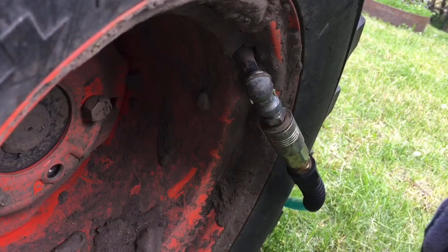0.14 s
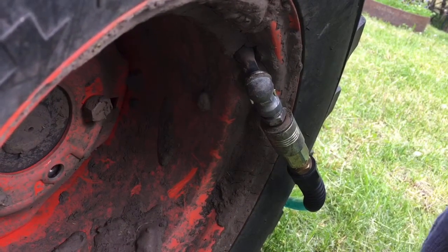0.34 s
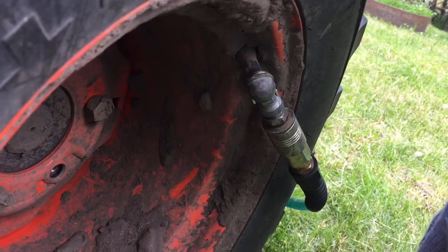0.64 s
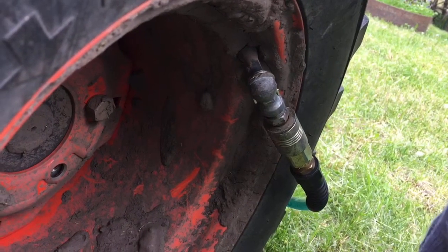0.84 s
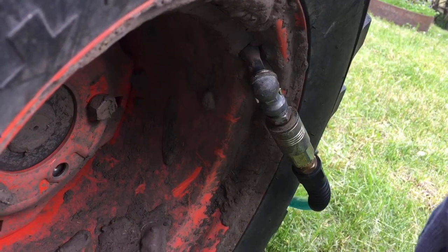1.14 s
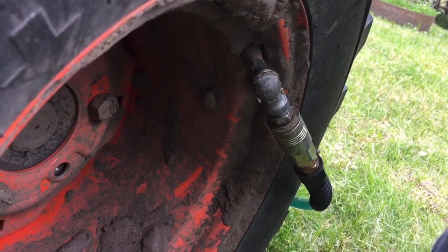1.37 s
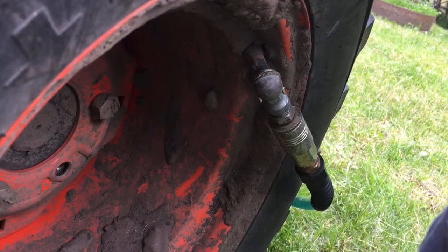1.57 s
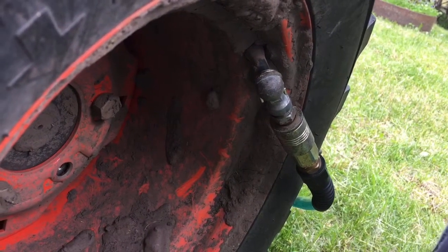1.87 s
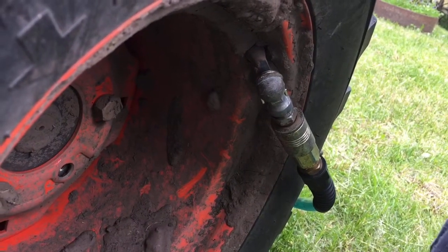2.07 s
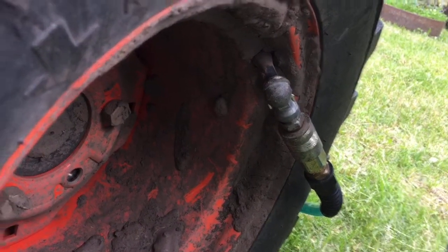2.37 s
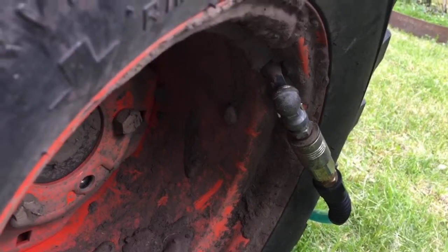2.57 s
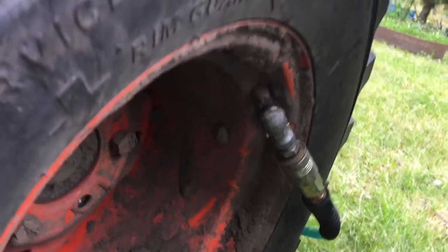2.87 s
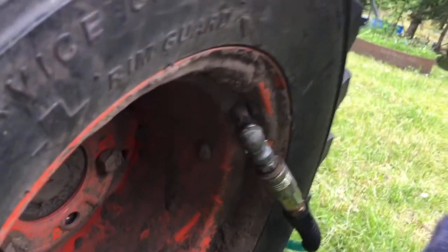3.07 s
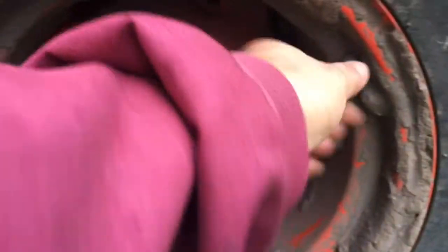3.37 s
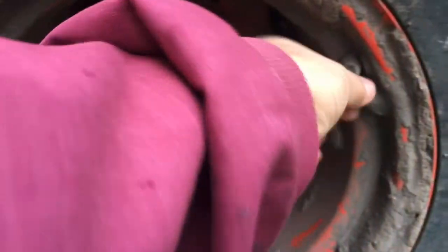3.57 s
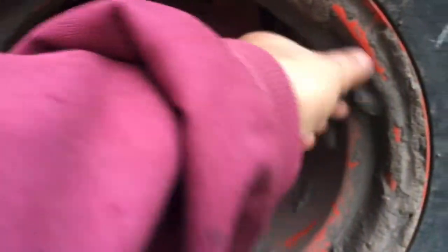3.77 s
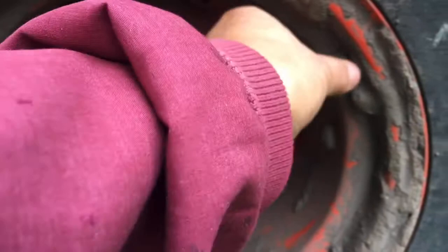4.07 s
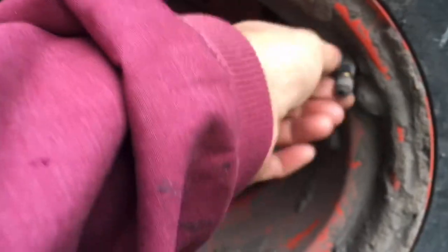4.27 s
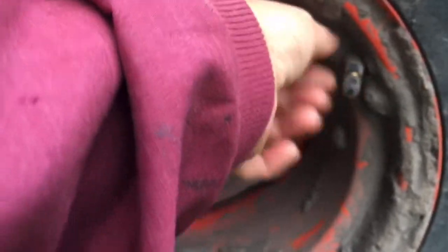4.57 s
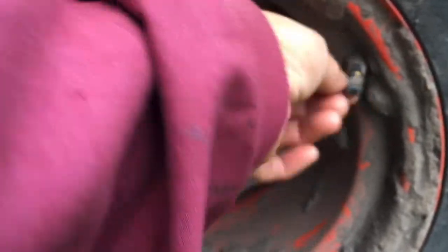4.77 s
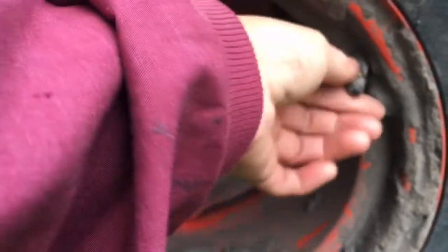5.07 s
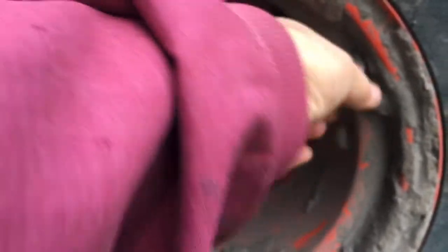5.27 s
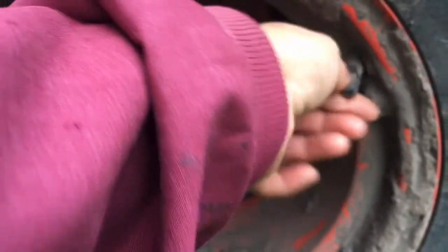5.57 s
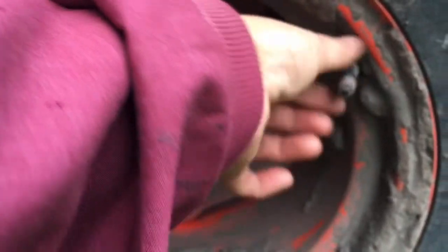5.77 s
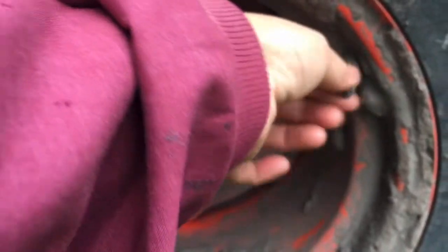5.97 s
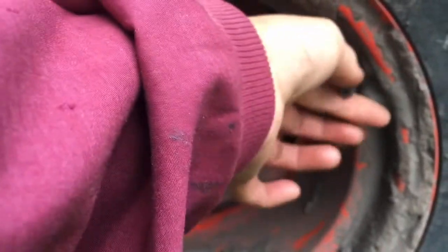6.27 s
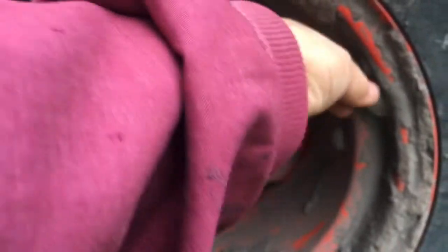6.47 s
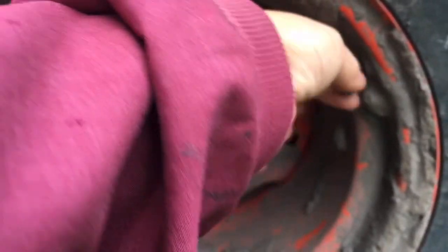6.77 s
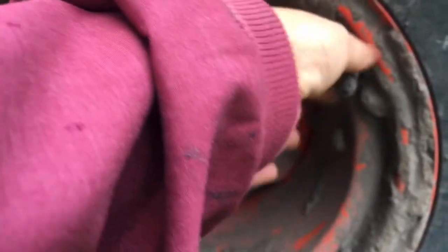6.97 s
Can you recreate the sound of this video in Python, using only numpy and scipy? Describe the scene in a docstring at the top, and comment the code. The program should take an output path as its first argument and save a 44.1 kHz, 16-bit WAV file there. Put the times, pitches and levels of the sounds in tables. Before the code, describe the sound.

Outdoors, pressurised air hisses sharply into a tyre, stops dead, then fingers lightly click a valve cap over a quiet distant motor hum.

```python
"""Out on a lawn, an air chuck hisses on a tractor tyre's valve: turbulent noise lifted by the rim's resonances.
A filtered-noise scuff and short low bumps reach the microphone, then the hiss stops abruptly.
Fingers turn the valve cap with ticks that ring small resonators, and a sleeve rustles as grainy noise.
A small engine hums some way off as a row of steady lines over open-air noise, breeze and a distant wash.
A few far birds call with sliding, hoarse tones that echo among trees."""
import sys
import numpy as np
from scipy import signal
from scipy.fft import rfft, irfft, next_fast_len
from scipy.io import wavfile

SR = 44100
rng = np.random.default_rng(int(sys.argv[2]) if len(sys.argv) > 2 else 0)


def generate_wav(sig):
    """Save sig (samples, or channels by samples) to the path in sys.argv[1] as 16-bit PCM at SR."""
    pcm = np.round(np.clip(np.atleast_2d(sig).T, -1, 1) * 32767).astype(np.int16)
    wavfile.write(sys.argv[1], SR, pcm)


N = 314874
FFT_SIZE = next_fast_len(N)
TIME = np.arange(N) / SR   # seconds
FREQ = np.maximum(np.arange(FFT_SIZE // 2 + 1) * SR / FFT_SIZE, 1)   # Hz
AIR_OFF_S = 3.142


def from_db(db):
    """Decibels to gain."""
    return 10 ** (np.asarray(db) / 20)


def rms_one(x):
    """Scale to unit rms."""
    return x / np.sqrt(np.mean(x ** 2) + 1e-20)


def colour(x, gain):
    """Filter by a gain given at each of FREQ."""
    return irfft(rfft(x, FFT_SIZE) * gain, FFT_SIZE)[:N]


def noise(spectrum, lift_db=0):
    """Noise of unit rms, its spectrum drawn through (Hz, dB) points."""
    hz, db = np.transpose(spectrum)
    spectrum_db = np.interp(np.log(FREQ), np.log(hz), db) + lift_db
    return rms_one(colour(rng.standard_normal(N), from_db(spectrum_db)))


def drift(rate_hz):
    """Random wandering of unit rms, with little movement faster than `rate_hz`."""
    return rms_one(colour(rng.standard_normal(N), 1 / (1 + (FREQ / rate_hz) ** 4)))


def swell(at, length):
    """A bell-shaped rise and fall around `at`."""
    return np.exp(-.5 * np.minimum(np.abs(TIME - at) / length, 10) ** 2)


def envelope(at, attack, hold, release):
    """A smooth rise to full strength at `at`, a hold and a smooth dying away."""
    early = np.maximum(at - TIME, 0) / attack
    late = np.maximum(TIME - at - hold, 0) / release
    return np.exp(-np.minimum(.5 * early ** 2 + late ** 1.5, 50))


def ring(clicks, hz, t60):
    """A resonator: each unit click starts a dying sine of height 1."""
    r, w = from_db(-60 / (t60 * SR)), 2 * np.pi * hz / SR
    return signal.lfilter([0, np.sin(w)], [1, -2 * r * np.cos(w), r * r], clicks + 1e-18)


def scatter(x, t60, wet_db):
    """The direct sound plus dense reflections that die away."""
    t = TIME[:SR // 2]
    tail = rng.standard_normal(len(t)) * np.exp(-np.log(1000) * t / t60)
    return x + from_db(wet_db) * signal.fftconvolve(x, tail / np.linalg.norm(tail))[:N]


# The jet at the chuck. Each row: frequency in Hz, relative density in dB per Hz.
JET_SPECTRUM = [(300, -46.5), (1050, -31.5), (1250, -28.5), (2000, -25), (2500, -27), (3000, -20),
                (4900, -16.5), (5900, -10.5), (7400, -19), (8500, -19), (9800, -21), (10450, -29),
                (11700, -24), (15600, -31.5)]
# Resonances of the rim's hollow and the chuck. Each row: centre in Hz, width in Hz, lift in dB.
RIM_RESONANCES = [(1365, 24, 11.5), (1656, 55, 8), (1798, 15, 13), (1867, 15, 14), (2120, 51, 5),
                  (2318, 36, 15.5), (2430, 91, 8.5), (2610, 21, 15), (2721, 36, 14), (2830, 144, 9.5),
                  (2970, 13.3, 14), (3076, 26, 14.5), (3190, 19, 13), (3250, 33, 11.5), (3586, 40, 11),
                  (3697, 50, 14.5), (3885, 130, 5), (4032.5, 34, 15), (4065, 21, 17.5), (4170, 18, 10.5),
                  (4348, 55, 10), (4412, 45, 13.5), (4750, 23, 5.5), (5266, 57, 14.5), (5344, 30, 12),
                  (5528, 19, 10), (5623, 94, 7), (5810, 23, 9), (6017, 24, 11), (6173, 78, 7.5),
                  (6251, 34, 8.5), (6330, 33, 5.5), (6500, 22, 5), (6800, 64, 1.5), (6730, 26, 7.5),
                  (6994, 34, 12), (7075, 26, 12)]
# The hollow rush. Each row: frequency in Hz, relative density in dB per Hz.
RUSH_SPECTRUM = [(300, -32), (450, -13), (750, 1.5), (1050, -5.5), (1280, 6.5), (1500, -6.5), (2500, -18.5)]
# The rush coming and going. Each row: time in seconds, level in dB before rush_db is added.
RUSH_LEVELS = [(0.55, -54), (0.78, -48.5), (1.05, -51.5), (1.4, -56), (1.8, -59), (2.1, -56), (2.4, -52.5),
               (2.7, -57.4), (3.05, -54)]
LOWER_JET_DB, TREBLE_DB = -30, -31.2
SAG_FROM_S, SAG_DB_PER_S = 1.8, 1.46


def air(flutter_db=0.48, flutter_hz=14, stop_s=0.00038, tail_db=-17, tail_s=0.0041, treble_hz=7000,
        rush_db=0.5):
    """The jet's turbulence is lifted at each resonance of the rim; a hollow rush comes and goes under it."""
    lift_db = sum(db / (1 + (2 * (FREQ - hz) / width) ** 4) for hz, width, db in RIM_RESONANCES)
    jet = noise(JET_SPECTRUM, lift_db)
    treble = colour(jet, 1 / (1 + (treble_hz / FREQ) ** 6))
    # in the treble the rim's resonances crowd together into a short, dense ring
    ringing = scatter(treble, t60=.09, wet_db=-3)
    # the flow holds, then its ringing sags below the treble, which stays level
    sag_db = SAG_DB_PER_S * np.maximum(TIME - SAG_FROM_S, 0)
    jet = (jet - treble) * from_db(LOWER_JET_DB - sag_db) + ringing * from_db(TREBLE_DB)
    jet = jet * from_db(flutter_db * drift(flutter_hz))
    rush = noise(RUSH_SPECTRUM) * from_db(rush_db + np.interp(TIME, *np.transpose(RUSH_LEVELS)))
    # the hiss drops at once and leaves a faint tail for a few milliseconds
    after = np.maximum(TIME - AIR_OFF_S, 0)
    closing = np.maximum(np.exp(-after / stop_s), from_db(tail_db) * np.exp(-after / tail_s))
    return (jet + rush) * closing


FIRING_HZ = 12.156
# The engine's lines. Each row: multiple of the firing rate, rms in dB once the air is off, before wavering.
ENGINE_LINES = [(4, -66), (6, -65.5), (8, -64), (10, -66), (12, -65.5), (13, -70), (14, -64), (16, -58),
                (17, -66), (18, -67), (21, -64.5), (22, -70.5), (23, -63), (24, -59), (25, -67),
                (26, -65.5), (27, -66.5), (28, -69.5), (30, -82), (36, -70), (37, -76), (38, -70.5),
                (42, -71), (44, -75), (46, -69), (49, -70.5), (50, -76.5), (51, -70), (54, -76.5)]
# Open air. Each row: frequency in Hz, relative density in dB per Hz.
OUTDOORS_SPECTRUM = [(20, -33), (35, -9), (50, 4), (80, 2.5), (130, -1), (300, -4.5), (400, -12.5),
                     (600, -9), (750, -19.5), (880, -10.5), (1100, -18.5), (2000, -29.5), (3600, -30),
                     (5000, -37), (8500, -35.5), (15500, -46)]


def engine_and_outdoors(wander=0.001253, waver_db=1.5, echo_spread_s=.03, floor_db=-52.5, throb_db=0.3,
                        early_db=-1.5):
    """Firings give a row of lines, each delayed by its own path; the background noise throbs with them."""
    turn = 2 * np.pi * np.cumsum(FIRING_HZ * (1 + wander * drift(2.58))) / SR
    hum = np.zeros(N)
    for multiple, db in ENGINE_LINES:
        late = 2 * np.pi * FIRING_HZ * rng.normal(0, echo_spread_s)
        # the breeze wavers each line on its own
        waver = np.interp(TIME, np.linspace(0, TIME[-1], 20), rng.standard_normal(20))
        line = np.sqrt(2) * np.cos(round(multiple) * (turn - late))
        hum += from_db(db + waver_db * waver) * line
    # fainter while the air runs
    hum *= from_db(np.interp(TIME, [AIR_OFF_S - .01, AIR_OFF_S], [early_db, 0]))
    return hum + noise(OUTDOORS_SPECTRUM) * from_db(floor_db + throb_db * np.cos(turn))


# The distant wash. Each row: frequency in Hz, relative density in dB per Hz.
WASH_SPECTRUM = [(400, -22), (750, 4), (1150, 5.5), (1600, -3), (2500, -30)]
WASH_QUIET_DB, WASH_LOUD_DB, WASH_FROM_S, WASH_RISE_S = -78, -65.5, 5.2, 0.55


def distant_wash():
    """Soft mid-band noise in the open air steps up late on and stays up."""
    level_db = np.interp(TIME, [WASH_FROM_S, WASH_FROM_S + WASH_RISE_S], [WASH_QUIET_DB, WASH_LOUD_DB])
    return noise(WASH_SPECTRUM) * from_db(level_db)


# The breeze on the microphone. Each row: frequency in Hz, relative density in dB per Hz.
RUMBLE_SPECTRUM = [(20, -27), (45, 2), (70, 1), (120, -21), (300, -40.5)]


def breeze(level_db=-54):
    """Light air rumbles on the microphone as low noise, holds and dies down."""
    gust = envelope(at=0.96, attack=.7, hold=1.8, release=0.86)
    return noise(RUMBLE_SPECTRUM) * from_db(level_db) * gust


# The rubbing. Each row: frequency in Hz, relative density in dB per Hz.
SCUFF_SPECTRUM = [(150, -34), (290, -3), (450, -7), (600, -4.5), (780, -9.5), (920, -23), (1120, -4),
                  (1450, -17.5), (2300, -13.5), (3000, -21), (6000, -19), (15000, -32)]
# A sleeve or shoe close by: one stroke and a short last catch.
# Each row: time at full strength in seconds, level in dB, then attack, hold and release in seconds.
SCUFF_STROKES = [(0.092, -30.5, 0.029, 0.05, 0.089), (0.254, -36.5, .004, .003, 0.013)]
STROKE_FASTEST_S, STROKE_WIDTH_S, RIBS_SLOW_HZ, RIBS_FAST_HZ = .13, .042, 325, 615


def scuff(grain_db=1.3, grain_hz=110, zip_db=-8, zip_width_hz=25, zip_attack_s=.02):
    """Rubbing catches and slips unevenly; ribbed fabric adds a rough note that falls as the stroke slows."""
    force = sum(from_db(db) * envelope(s, attack, hold, release)
                for s, db, attack, hold, release in SCUFF_STROKES)
    speed = swell(STROKE_FASTEST_S, STROKE_WIDTH_S)
    ribs_hz = RIBS_SLOW_HZ + (RIBS_FAST_HZ - RIBS_SLOW_HZ) * speed
    phase = 2 * np.pi * np.cumsum(ribs_hz) / SR
    # two wandering quadrature parts make the note a narrow noise band
    ribs = drift(zip_width_hz) * np.cos(phase) + drift(zip_width_hz) * np.sin(phase)
    # the note comes in just before the fastest point
    singing = np.clip(1 + (TIME - STROKE_FASTEST_S) / zip_attack_s, 0, 1)
    rubbing = noise(SCUFF_SPECTRUM) + from_db(zip_db) * ribs * singing
    return rms_one(rubbing * from_db(grain_db * drift(grain_hz))) * force


# Bumps and puffs on the microphone.
# Each row: centre in seconds, peak in dB, frequency in Hz, bell length in seconds.
MICROPHONE_BUMPS = [(0.919, -42, 42, 0.017), (1.362, -23.5, 97, 0.0029), (1.372, -34, 55, 0.016),
                    (1.427, -38, 75, 0.01), (1.468, -37, 58, 0.017)]


def bumps():
    """Each bump swings the microphone briefly: a low cosine under a bell."""
    return sum(from_db(db) * swell(s, length) * np.cos(2 * np.pi * hz * (TIME - s))
               for s, db, hz, length in MICROPHONE_BUMPS)


def note(s, length, start_hz, end_hz, quaver):
    """A bird's note slides quickly to its pitch, which quavers."""
    along = np.clip((TIME - s) / length, 0, 1)
    hz = (end_hz + (start_hz - end_hz) * (1 - along) ** 2) * (1 + quaver)
    return np.sin(np.pi * along) * np.sin(2 * np.pi * np.cumsum(hz) / SR)


# Hoarse falling chips. Each row: start in seconds, length in seconds, end pitch in Hz, level in dB.
BIRD_CHIPS = [(3.142, .055, 3770, -67), (3.207, .042, 3300, -61.5), (3.235, .09, 5500, -68),
              (3.233, .05, 6660, -69), (3.842, .022, 4400, -69), (3.895, .027, 3850, -67),
              (4.803, 0.046, 3300, -63.5), (4.82, .1, 5600, -71), (5.015, .03, 6250, -67),
              (5.585, .025, 4300, -72), (6.6, 0.032, 4150, -69)]
# One bird's thin calls that slide up to pitch.
# Each row: start in seconds, length in seconds, pitch in Hz, slide in Hz, upper voice's level in dB.
BIRD_WHISTLES = [(4.36, .086, 8750, 150, -63), (6.52, .08, 8660, 650, -62)]
CHIP_FALL, CHIP_HOARSENESS, WHISTLE_HOARSENESS = 0.074, 0.051, 0.0082   # shares of the pitch
SECOND_VOICE_HZ, SECOND_VOICE_DB, SECOND_VOICE_LATE_S = 6800, -8, .015


def birds(quaver_hz=500, trees_t60=0.5, trees_db=-6, husk_db=-5, husk_hz=7950, husk_hoarseness=.05):
    """Thin, husky two-voiced whistles and hoarse chips echo among trees."""
    quaver = drift(quaver_hz)
    whistle_quaver = WHISTLE_HOARSENESS * quaver
    out = np.zeros(N)
    for s, length, hz, db in BIRD_CHIPS:
        out += from_db(db) * note(s, length, hz * (1 + CHIP_FALL), hz, CHIP_HOARSENESS * quaver)
    for s, length, hz, slide_hz, db in BIRD_WHISTLES:
        upper = note(s, length, hz - slide_hz, hz, whistle_quaver)
        lower = note(s + SECOND_VOICE_LATE_S, length, SECOND_VOICE_HZ, SECOND_VOICE_HZ, whistle_quaver)
        husk = note(s, length, husk_hz, husk_hz, husk_hoarseness * quaver)
        out += from_db(db) * (upper + from_db(SECOND_VOICE_DB) * lower + from_db(husk_db) * husk)
    return scatter(out, t60=trees_t60, wet_db=trees_db)


# The sleeve's swish. Each row: frequency in Hz, relative density in dB per Hz.
CLOTH_SPECTRUM = [(1500, -16.5), (3500, -24), (5000, -4), (7000, 1.5), (9300, 2.5), (10500, -3), (12000, 2),
                  (15500, -8)]
# The rasp of a grip. Each row: frequency in Hz, relative density in dB per Hz.
RASP_SPECTRUM = [(800, -15), (1700, 2.5), (2300, -2), (3500, -5), (5000, -22), (9000, -21)]
# A swish with each turn of the hand. Each row: centre in seconds, bell length in seconds, level in dB.
HAND_TURNS = [(3.266, .025, -73), (3.47, .015, -71), (3.878, .025, -66), (4.37, .04, -68),
              (4.679, .014, -59), (5.152, 0.11, -69.5), (5.554, .045, -67), (5.897, .04, -73),
              (6.12, .011, -70), (6.478, .009, -62.5), (6.773, 0.015, -65), (7.065, .018, -68)]
# A firmer grip rasping on the cap. Each row: centre in seconds, level in dB.
FIRM_GRIPS = [(3.47, -69), (4.0, -67), (4.775, -65), (5.65, -63.5), (6.805, -61.5)]
GRIP_S, SWISH_UNDER_GRIP_DB, RASP_UNDER_SWISH_DB = 0.012, -7.5, -9


def sleeve(grain_db=4.5, grain_hz=300, patch_db=1.5, patch_hz=40):
    """Fibres catch and let go with each turn of the hand; a firm grip adds a lower rasp."""
    turns = sum(from_db(db) * swell(s, length) for s, length, db in HAND_TURNS)
    grips = sum(from_db(db) * swell(s, GRIP_S) for s, db in FIRM_GRIPS)
    swish = turns + from_db(SWISH_UNDER_GRIP_DB) * grips
    rasp = grips + from_db(RASP_UNDER_SWISH_DB) * turns
    cloth = noise(CLOTH_SPECTRUM)
    # the coarse and the fine threads catch at different moments
    fine = colour(cloth, 1 / (1 + (10000 / FREQ) ** 10))
    coarse = cloth - fine
    cloth = sum(part * rms_one(from_db(patch_db * drift(patch_hz))) for part in (coarse, fine))
    grain = rms_one(from_db(grain_db * drift(grain_hz)))
    return (swish * cloth + rasp * noise(RASP_SPECTRUM)) * grain


HANDLING_FROM_S, FAINT_TICKS_PER_S, FAINT_TICK_DB, FAINT_TREBLE_DB = 3.4, 1.6, -53.5, -3


def faint_ticks():
    """Faint bright ticks at chance moments while the cap is handled, in rows like those of CLICKS."""
    count = int(FAINT_TICKS_PER_S * (TIME[-1] - HANDLING_FROM_S))
    times = rng.uniform(HANDLING_FROM_S, TIME[-SR // 10], count)
    return [(s, FAINT_TICK_DB, FAINT_TREBLE_DB) for s in times]


# Fingers click the valve cap.
# Each row: time in seconds, strength in dB before level_db, treble in dB against neutral_treble_db.
CLICKS = [(3.461, -45, -9), (3.4756, -35.5, -12), (3.7487, -35.5, -8), (4.191, -39, -23), (4.6744, -51, -1),
          (4.7691, -48, -19), (4.995, -44, -17), (5.4048, -28.5, -10), (5.7984, -44, -22), (6.046, -53, -3),
          (6.175, -43, -27), (6.81, -48, -28)]
# Resonances of cap and stem. Each row: frequency in Hz, relative level in dB, 60 dB decay in seconds.
CAP_MODES = [(1780, -18, 0.0013), (2150, 0.5, 0.0054), (2530, -6, 0.0053), (3370, -4.5, 0.0053),
             (4100, -5, 0.0044), (7700, -7, 0.0016), (8870, 1.5, 0.0015), (11400, -1, 0.0015)]


def cap_ticks(level_db=-8, neutral_treble_db=-13, slip_s=0.00089, slip_share=0.48):
    """Each tick is a snap with a smaller slip just after it, ringing in the cap and echoing in the rim."""
    s, strength_db, treble_db = np.transpose(list(CLICKS) + faint_ticks())
    slip = s + slip_s * rng.uniform(.6, 1.2, len(s))
    out = np.zeros(N)
    for hz, mode_db, t60 in CAP_MODES:
        brightness_db = (treble_db - neutral_treble_db) * (hz > 6000)
        chance_db = rng.normal(0, 1, len(s))
        size = from_db(strength_db + level_db + mode_db + brightness_db + chance_db)
        clicks = np.zeros(N)
        clicks[(s * SR).astype(int)] = size
        clicks[(slip * SR).astype(int)] += slip_share * size
        out += ring(clicks, hz, t60)
    # so small a thing radiates no bass, and fingertips soften the very top
    out = signal.sosfilt(signal.butter(2, [1400, 13000], "band", fs=SR, output="sos"), out)
    return scatter(out, t60=0.019, wet_db=-4.5)


def scene():
    """One microphone, heard alike in both ears."""
    mono = air() + engine_and_outdoors() + distant_wash() + breeze()
    mono = mono + scuff() + bumps() + birds() + sleeve() + cap_ticks()
    return np.stack([mono, mono])


def record(dry, cutoff_hz=15800):
    """A steep low-pass removes the very top."""
    return signal.sosfilt(signal.ellip(12, .1, 80, cutoff_hz, fs=SR, output="sos"), dry)


dry = scene()
out = record(dry)
generate_wav(out)
```